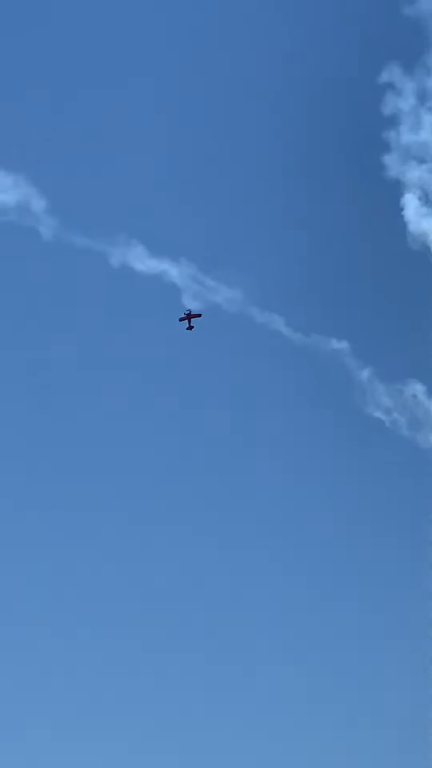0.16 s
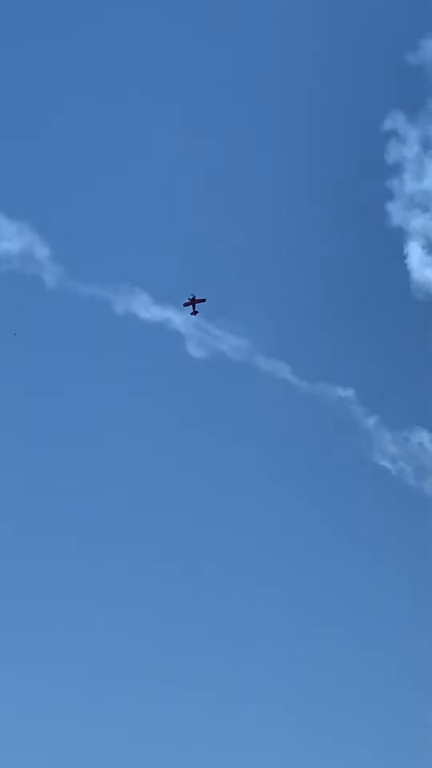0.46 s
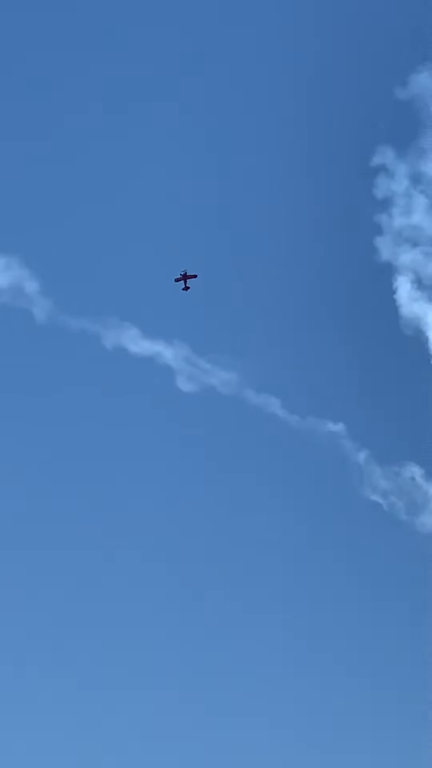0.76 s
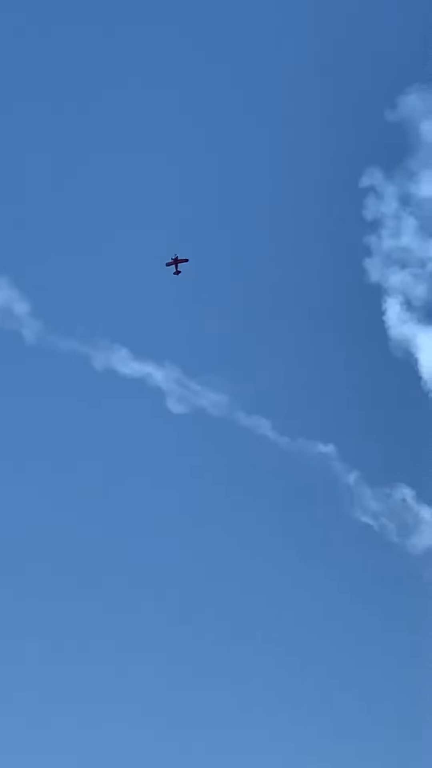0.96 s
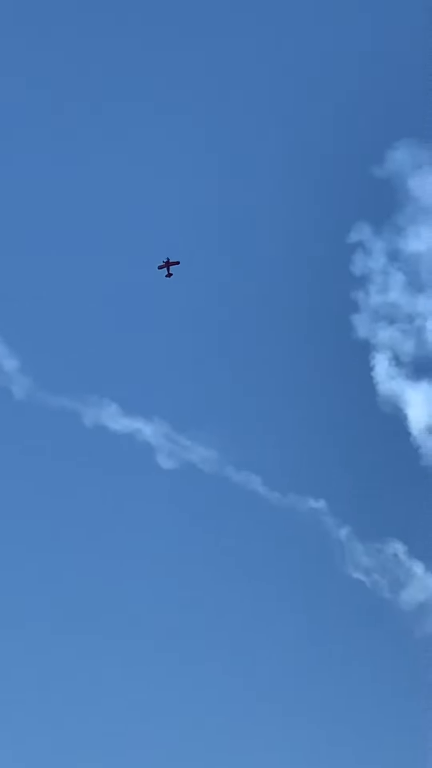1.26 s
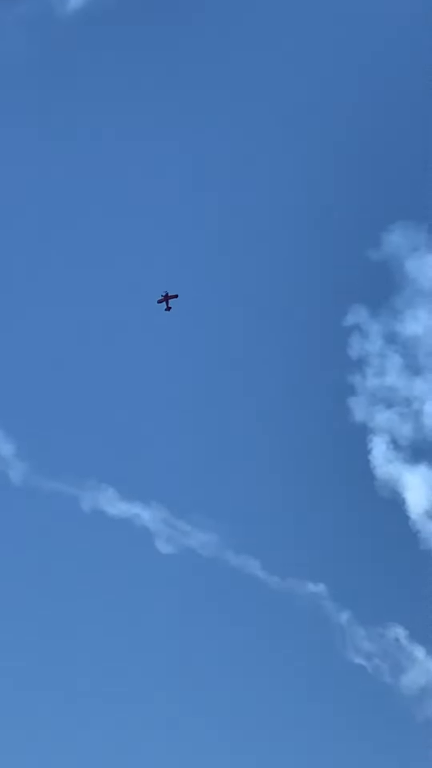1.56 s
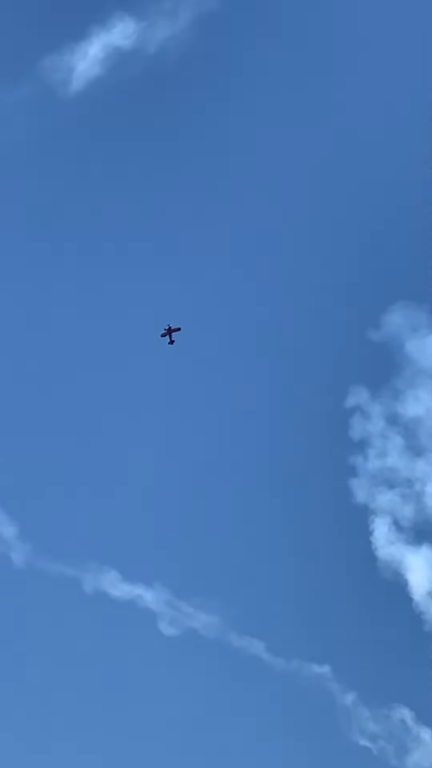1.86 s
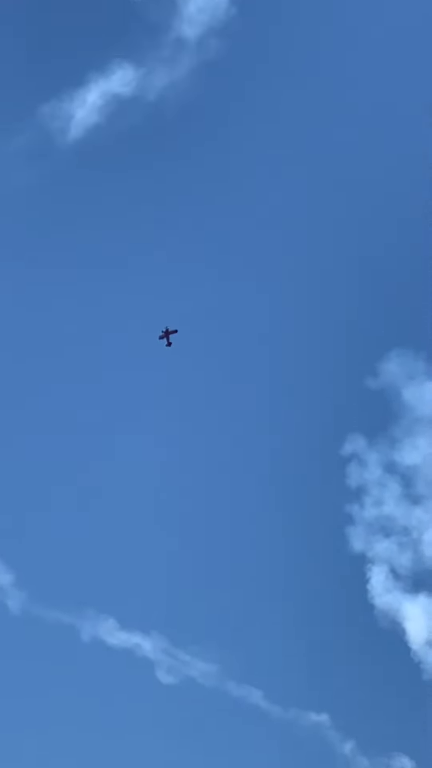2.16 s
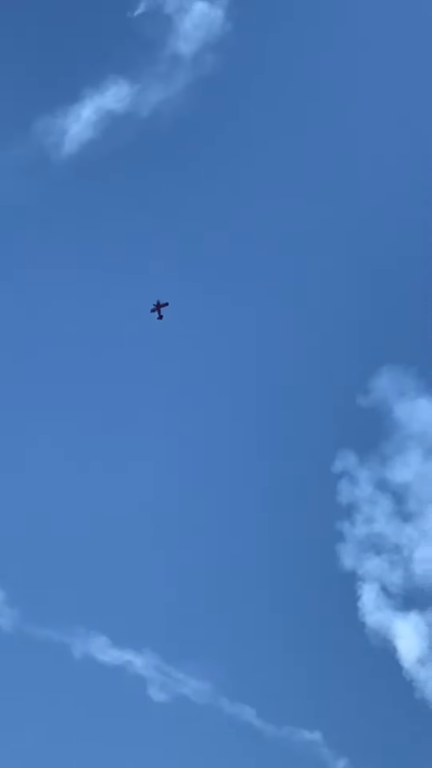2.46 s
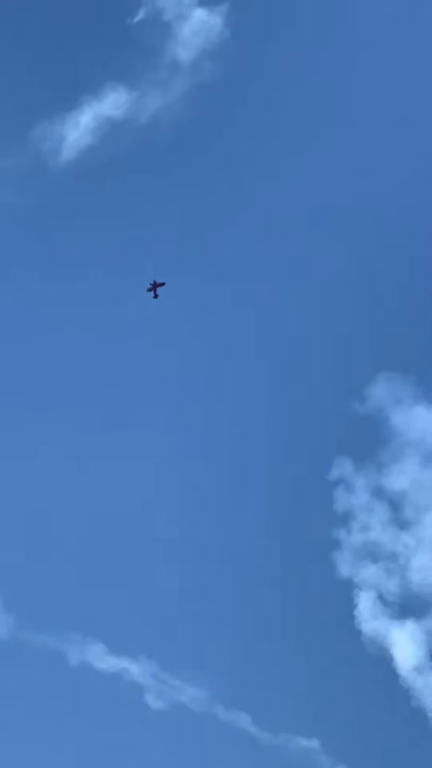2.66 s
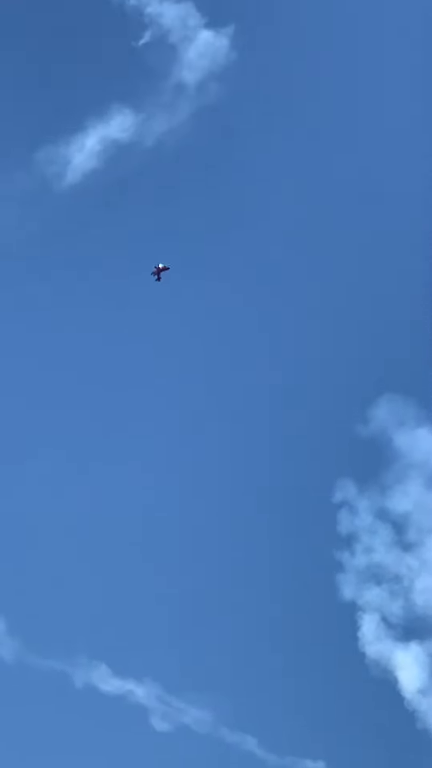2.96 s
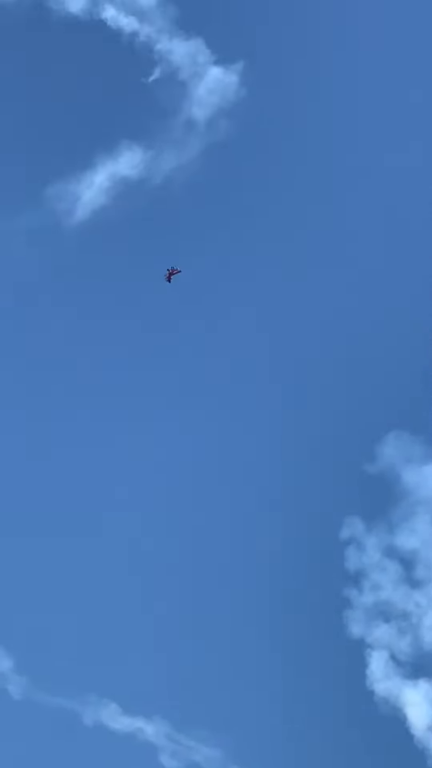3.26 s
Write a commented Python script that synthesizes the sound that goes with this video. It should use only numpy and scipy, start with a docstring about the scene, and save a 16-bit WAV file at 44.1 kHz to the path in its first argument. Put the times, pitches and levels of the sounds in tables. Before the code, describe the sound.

A small aerobatic propeller plane swells past high overhead, rasping, then sinks in pitch and recedes.

```python
"""An aerobatic plane comes in faintly, swells as it passes high overhead, then pulls away, its pitch sinking.
Three propeller blades and six cylinders beat at one rate: a deep drone of four harmonics, and above it
sharp blade pulses that rasp while it is near and blur into a rush of noise as it recedes.
Uneven cylinders put a burble between the harmonics, and a low roar of noise crests after the pass.
Light wind, low noise with slow bumps of level, stays under it all."""
import sys
import numpy as np
from scipy import signal
from scipy.fft import rfft, irfft, next_fast_len
from scipy.io import wavfile
from scipy.ndimage import uniform_filter1d, minimum_filter1d, map_coordinates

SR = 44100
rng = np.random.default_rng(int(sys.argv[2]) if len(sys.argv) > 2 else 0)


def wav_out(sig):
    """Save sig, one row per channel (or a flat mono array), as 16-bit PCM at SR to the path in sys.argv[1]."""
    wavfile.write(sys.argv[1], SR, np.round(np.clip(np.atleast_2d(sig).T, -1, 1) * 32767).astype(np.int16))


N = 149940

# shared blade and firing rate as heard, sinking through the pass: time_s, pitch_hz
PASSING_PITCH = [(0, 172.1), (.27, 168.5), (.5, 162.7), (.9, 154.1), (1.3, 145.4), (1.55, 140.3),
                 (1.8, 137), (2.0, 135.2), (2.3, 132.4), (2.7, 130.8), (3.0, 130.9), (3.4, 128.5)]


def passing_pitch():
    """Blade and firing rate in Hz at every sample, before the slight waver."""
    return curves(PASSING_PITCH)[0]


def count_beats():
    """Running count of blade beats: the pitch, with a slight random waver, added up over time."""
    waver = 1 + 0.00052 * wobble(13.1)
    return np.cumsum(passing_pitch() * waver) / SR


# levels of the upper sound, before flutter: time_s, body_db, rasp_db, edge_db, hiss_db
UPPER_LEVELS = [(0.02, -59, -55, -57.5, -81.5), (0.16, -42, -45, -57.5, -77.5),
                (0.27, -37.5, -37, -53, -72), (0.37, -39, -33, -48, -72), (0.44, -32, -27.5, -42.5, -65),
                (0.479, -27, -26.5, -34.5, -57.5), (0.591, -30, -34, -42.5, -61.5),
                (0.67, -32.5, -29.5, -37, -56.5), (0.79, -31, -27, -37.5, -52),
                (0.88, -23.5, -28.5, -35, -50.5), (1.02, -20.5, -19, -29.5, -47),
                (1.12, -18, -21, -31, -47.5), (1.19, -16, -17, -20.5, -39), (1.252, -26.5, -22, -39, -62.5),
                (1.302, -11, -20.5, -21.5, -51), (1.334, -24.5, -25, -41, -59),
                (1.43, -18.5, -28.5, -41.5, -59), (1.521, -32, -36.5, -50, -68.5),
                (1.6, -29, -31.5, -44.5, -64.5), (1.689, -32.5, -37.5, -54, -71),
                (1.8, -28.5, -37.5, -50.5, -67), (1.871, -45, -37, -48.5, -68.5),
                (1.93, -38.5, -37, -47, -71), (2.079, -34, -38, -51.5, -70.5),
                (2.29, -43.5, -40.5, -49.5, -67), (2.46, -41.5, -41.5, -53.5, -72.5),
                (2.719, -40.5, -38.5, -47.5, -66), (2.771, -39.5, -44.5, -53.5, -70.5),
                (2.949, -46, -46.5, -57.5, -78.5), (3.3, -46.5, -40, -55, -73), (3.4, -44, -46, -59.5, -78)]
# those four bands: low_hz, high_hz, pulses_over_noise_db (added to the clarity)
UPPER_BANDS = [(480, 1000, 8), (1000, 2600, -1.5), (2600, 4300, -8.5), (4600, 11000, -13)]
# how far the blade pulses stand out of the rush: time_s, clarity_db
PULSE_CLARITY = [(0, -1), (.3, 5), (.5, 8), (.75, 9), (1.05, 16), (1.25, 14), (1.4, 9), (1.55, 1),
                 (1.8, -4), (2.1, -6), (2.4, -14), (3.4, -18)]
FLUTTER_DB, FLUTTER_RATE = 1, 24.66  # level flutter of each band, knots a second


def propeller(beats):
    """Blade pulses and the rush of air that surges with them, blended band by band."""
    clarity_db, = curves(PULSE_CLARITY)
    pulses = echoed_pulses(beats)
    rush = air_rush(beats, clarity_db)
    out = 0
    for (low_hz, high_hz, clear_db), level_db in zip(UPPER_BANDS, curves(UPPER_LEVELS)):
        clear = amp(clarity_db + clear_db)
        blend = clear * band(pulses, low_hz, high_hz) + band(rush, low_hz, high_hz)
        blend = blend / np.sqrt(1 + clear ** 2)  # the mix does not change the level
        out = out + blend * amp(level_db + FLUTTER_DB * wobble(FLUTTER_RATE))
    return out


# relative colour of a blade pulse, each band being levelled afterwards: frequency_hz, level_db
BLADE_COLOUR = [(600, 26), (760, 15.5), (1050, 2.5), (1350, 0), (2050, -4.5), (2450, -15), (3000, -23.5),
                (3900, -22.5), (4900, -40.5), (6500, -36), (8000, -50.5), (10000, -70)]
# relative pulse size of the six cylinders over one engine cycle: size_db
CYLINDER_SIZES = [-0.73, -0.64, 1, 1, -.8, -0.3]
JITTER_S, SIZE_SCATTER_DB = 1.9e-5, 1.2  # unevenness from pulse to pulse
SHIMMER_DB, SHIMMER_RATE = 2.2, 10.08  # level drift of each harmonic, knots a second
SCATTER_RAD_PER_HZ, SCATTER_RATE = 2.7e-4, 28  # phase drift of each harmonic, knots a second


def blade_pulses(beats, count=66):
    """The harmonics above the drone meet in one sharp spike a beat, uneven in time and size.
    Turbulent air makes each shimmer and scatters its phase, the higher ones most."""
    pitch_hz = passing_pitch()
    beat = np.arange(1024)
    late, size = rng.standard_normal((len(beat), 2)).T
    late_beats = JITTER_S * pitch_hz * np.interp(beats, beat, late)
    turn = 2 * np.pi * (beats + late_beats)
    cylinder_db = np.take(CYLINDER_SIZES, beat, mode="wrap")
    size_db = np.interp(beats, beat, SIZE_SCATTER_DB * size + cylinder_db)
    out = 0
    for n in range(5, count):
        hz = n * pitch_hz
        scatter = np.minimum(SCATTER_RAD_PER_HZ * hz, 1) * wobble(SCATTER_RATE)
        level_db = along(BLADE_COLOUR, hz) + SHIMMER_DB * wobble(SHIMMER_RATE)
        out = out + amp(level_db) * np.cos(n * turn + scatter)
    return amp(size_db) * out


# near reflection behind each pulse: time_s, delay_s
PULSE_ECHO = [(0, 0.002035), (0.599, 0.00164), (1.103, 0.001444), (1.217, 0.001025), (1.699, 0.0009)]


def echoed_pulses(beats):
    """Each blade pulse is followed by a near reflection, whose drifting delay moves a comb through the tone."""
    return reflected(blade_pulses(beats), PULSE_ECHO, gain=.52)


# relative colour of the rush: frequency_hz, level_db_per_hz
RUSH_COLOUR = [(400, -10.5), (540, -4.5), (720, -6), (1000, -6), (1450, 0), (2100, -4.5), (2900, -9),
               (3300, -16.5), (3900, -21.5), (4700, -35.5), (6200, -44.5), (7500, -58.5), (9000, -69.5)]
# ground bounce of the rush: time_s, delay_s
GROUND_BOUNCE = [(0, .0012), (1.998, 0.002457), (2.603, 0.00285), (3.4, 0.0029)]
RUSH_PULSING = 0.36  # limit of the surge depth, approached as the pulses get clearer


def air_rush(beats, clarity_db):
    """Patchy noise with a ground bounce, surging once a beat, more deeply the clearer the pulses."""
    bounced = np.array([reflected(ear, GROUND_BOUNCE, gain=0.4) for ear in noise(RUSH_COLOUR, patchy_db=3)])
    depth = RUSH_PULSING / (1 + amp(-clarity_db))
    surge = np.exp(depth * np.cos(2 * np.pi * beats))
    return bounced * surge / np.sqrt(np.i0(2 * depth))  # the surge adds no power


# levels of the four lowest harmonics, which fade in and out separately: time_s, level_db
FIRST_HARMONIC = [(0, -38.5), (.22, -28.5), (.35, -27), (.44, -33.5), (.6, -22.5), (.85, -17), (1.1, -16.5),
                  (1.3, -20.5), (1.6, -20), (1.7, -25.5), (1.85, -28), (2.0, -34), (2.25, -35.5),
                  (2.4, -31.5), (2.62, -37.5), (2.72, -50), (2.92, -50.5), (3.2, -68), (3.4, -42)]
SECOND_HARMONIC = [(0, -41), (0.101, -38), (.19, -43.5), (.27, -31), (0.348, -35), (0.438, -21.5),
                   (0.551, -26), (.63, -28), (0.681, -41.5), (0.752, -30), (1.018, -32.5), (1.198, -19),
                   (1.619, -20.5), (1.848, -22), (1.931, -34), (2.28, -33), (2.418, -26.5), (2.679, -29),
                   (3.08, -27), (3.4, -34.5)]
THIRD_HARMONIC = [(0, -43.5), (0.259, -42), (0.361, -30), (.44, -41.5), (0.546, -32), (.64, -49),
                  (0.718, -32), (0.899, -26.5), (1.019, -34.5), (1.198, -25), (1.401, -32.5), (1.5, -69.5),
                  (1.6, -29.5), (1.721, -34.5), (1.838, -44.5), (2.018, -28.5), (2.549, -39), (2.848, -43),
                  (3.4, -41.5)]
FOURTH_HARMONIC = [(.08, -57), (0.288, -28.5), (.39, -38), (0.491, -23.5), (0.601, -28), (0.741, -21),
                   (.8, -41), (.89, -27), (1.19, -18.5), (1.3, -18.5), (1.441, -20), (1.53, -46.5),
                   (1.571, -22), (1.63, -24), (1.72, -40.5), (1.802, -26), (1.881, -42.5), (2.041, -33),
                   (2.219, -50.5), (3.4, -61.5)]
DRONE_OFFSET_BEATS = .71  # phase offset; the lowest harmonic crests close to the blade pulse
WAVER_DB, WAVER_RAD = 1, 0.14  # turbulence on the drone


def drone(beats):
    """The four lowest harmonics of propeller and engine, wavering in the moving air."""
    out = 0
    harmonics = [FIRST_HARMONIC, SECOND_HARMONIC, THIRD_HARMONIC, FOURTH_HARMONIC]
    for k, levels in enumerate(harmonics, 1):
        level = amp(curves(levels)[0] + WAVER_DB * wobble(13))
        phase = 2 * np.pi * k * (beats - DRONE_OFFSET_BEATS) + WAVER_RAD * wobble(25)
        out = out + level * np.sqrt(2) * np.sin(phase)  # root 2: levels are rms
    return out


# The next three add up in dB to the level of a burble line.
# rise and fall of the exhaust burble: time_s, level_db
BURBLE_LEVEL = [(0, -49.5), (.25, -43.5), (.8, -47.5), (1.2, -37.5), (1.65, -43.5), (2.0, -47),
                (2.5, -50.5), (2.9, -52), (3.4, -50.5)]
# colour of the burble: frequency_hz, level_db
PIPE_COLOUR = [(40, -35), (65, -11), (88, -3.5), (125, -12.5), (185, 1.5), (235, -1), (310, 3), (380, -8.5),
               (450, -5), (560, -1), (680, -1), (900, -12.5), (1200, -14)]
# the five lines between two harmonics, lowest first: level_db
BETWEEN_LINES = [-2.5, 5, -5.5, -8.5, -18]
BURBLE_FADE_DB, BURBLE_FADE_RATE = 2.5, 5.36  # fading of each line, knots a second


def exhaust(beats, count=54):
    """Unequal cylinders sound at multiples of the engine cycle, each line fading on its own."""
    pitch_hz = passing_pitch()
    cylinders, out = len(CYLINDER_SIZES), 0
    for n in range(2, count):
        if n % cylinders == 0:
            continue  # the harmonics themselves belong to drone and pulses
        colour_db = along(PIPE_COLOUR, pitch_hz * n / cylinders) + BETWEEN_LINES[n % cylinders - 1]
        fade_db = BURBLE_FADE_DB * wobble(BURBLE_FADE_RATE)
        turns = beats * n / cylinders + rng.random()
        out = out + amp(colour_db + fade_db) * np.cos(2 * np.pi * turns)
    return out * amp(curves(BURBLE_LEVEL)[0])


# swell of the plane's low roar: time_s, level_db
ROAR_LEVEL = [(0, -62.5), (.5, -49.5), (1.2, -41.5), (2.1, -34), (2.7, -38), (3.4, -42.5)]
# relative colour of the roar: frequency_hz, level_db_per_hz
ROAR_TONE = [(60, -23.5), (110, -5), (200, -1.5), (310, 10.5), (400, 5), (480, -9), (700, -29), (1500, -66)]


def low_roar():
    """Low, slightly patchy noise from the plane, rising and falling smoothly."""
    return noise(ROAR_TONE, patchy_db=1) * amp(curves(ROAR_LEVEL)[0])


# relative colour of wind on the microphone: frequency_hz, level_db_per_hz
WIND_COLOUR = [(20, -5.5), (32, -25.5), (50, -5), (80, 6), (110, 1), (200, -7.5), (600, -67)]
WIND_DB, WIND_BUMP_DB, WIND_BUMP_RATE = -43, 1.5, 12  # rms level, bump depth, knots a second


def wind():
    """Soft low bumps of wind on the microphone, as noise with a wandering level."""
    bumps = amp(WIND_BUMP_DB * wobble(WIND_BUMP_RATE))
    return amp(WIND_DB) * unit(noise(WIND_COLOUR, patchy_db=.5) * bumps)


# width of all noise, side against mid: frequency_hz, side_over_mid_db
NOISE_SPREAD = [(60, -19.5), (500, -15), (1200, -7), (2200, -21), (4000, 5.5), (8000, -10)]


def noise(colour, patchy_db):
    """Stereo noise of rms 1 with drifting patches of gain."""
    def mid_and_side(hz):
        return amp(along(colour, hz)) * np.array([np.ones_like(hz), amp(along(NOISE_SPREAD, hz))])

    mid, side = filtered(patchy(rng.standard_normal((2, N)), patchy_db), mid_and_side)
    return unit(np.array([mid + side, mid - side]))


def patchy(x, depth_db):
    """Turbulent air lifts and drops patches of frequency and time."""
    spectrum = signal.stft(x, nperseg=1024)[2]
    field = rng.standard_normal(spectrum.shape[-2:])
    for _ in range(2):
        field = uniform_filter1d(field, size=6, axis=0)
        field = uniform_filter1d(field, size=10, axis=1)
    return signal.istft(spectrum * amp(depth_db * unit(field)), nperseg=1024)[1][..., :N]


def reflected(x, delays, gain):
    """x and one copy whose delay drifts as the plane moves."""
    read_at = np.arange(N) - SR * curves(delays)[0]
    return x + gain * map_coordinates(x, [read_at], mode="nearest")


def band(x, low_hz, high_hz, order=16):
    """One band of x, held near rms 1 while its colour drifts."""
    def between(hz):
        return 1 / (1 + (hz / high_hz) ** order) - 1 / (1 + (hz / low_hz) ** order)

    part = filtered(x, between)
    power = np.atleast_2d(part ** 2).mean(axis=0)
    window = int(.05 * SR)
    for _ in range(2):
        power = uniform_filter1d(power, window)
    return part / np.sqrt(abs(power) + 1e-20)


def amp(db):
    """Decibels to gain."""
    return 10 ** (np.asarray(db) / 20)


def unit(x):
    """Scale to rms 1."""
    return x / np.sqrt(np.mean(x ** 2) + 1e-20)


def along(points, hz):
    """Rows of frequency and value, read on a log frequency axis."""
    f, v = np.transpose(points)
    return np.interp(np.log(hz + 1), np.log(f + 1), v)


def curves(rows):
    """One value per sample for each column after the time."""
    s, *cols = np.transpose(rows)
    return [np.interp(np.arange(N) / SR, s, c) for c in cols]


def wobble(rate):
    """A smooth random curve, rate knots a second."""
    at = np.arange(0, N + 64, 64)
    knots = rng.standard_normal(512)
    return np.interp(np.arange(N), at, map_coordinates(knots, [at * rate / SR], mode="mirror"))


def filtered(x, response):
    """x times a response of frequency."""
    m = 2 * next_fast_len(N // 2 + 8192)
    return irfft(rfft(x, m) * response(np.fft.rfftfreq(m, 1 / SR)), m)[..., :N]


# level balance of the microphone pair: frequency_hz, left_over_right_db
PAIR_LEAN = [(60, 11), (100, 3), (180, -4), (300, -0.5), (520, -5.5), (900, -2), (1500, -1.5), (2600, -0.5),
             (4500, -1), (8000, 0)]
# phase of the pair: frequency_hz, left_lead_rad
PAIR_TURN = [(30, 0), (140, -.45), (280, -.7), (520, -1.15), (900, -.7), (1300, -.2), (2240, .6),
             (2600, 1.6), (3300, 2.3), (4500, 2.3), (6300, 0)]


def microphone_pair(plane):
    """Two ports hear the plane with a level and phase offset, half on each side."""
    ears = np.array([[.5], [-.5]])
    return filtered(plane, lambda hz: amp(ears * along(PAIR_LEAN, hz)) * np.exp(1j * ears * along(PAIR_TURN, hz)))


def scene():
    """The plane, heard through the two microphone ports, over the wind."""
    beats = count_beats()
    plane = propeller(beats) + drone(beats) + exhaust(beats) + low_roar()
    return microphone_pair(plane) + wind()


CEILING, HOLD_S, TOP_HZ = .92, .006, 9000  # limiter ceiling (full scale 1), its smoothing time, band limit


def record(dry):
    """A limiter holds the tallest pulses; little is kept above the band limit."""
    hold = int(HOLD_S * SR)
    needed = CEILING / np.maximum(abs(dry).max(axis=0), CEILING)
    gain = uniform_filter1d(minimum_filter1d(needed, 2 * hold), hold)
    return filtered(dry * gain, lambda hz: 1 / np.sqrt(1 + (hz / TOP_HZ) ** 32))


dry = scene()
out = record(dry)
wav_out(out)
```